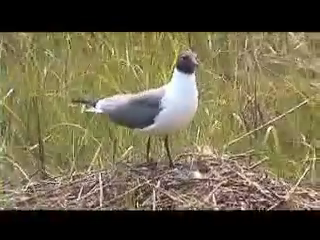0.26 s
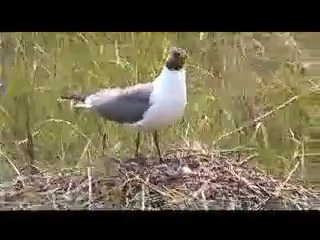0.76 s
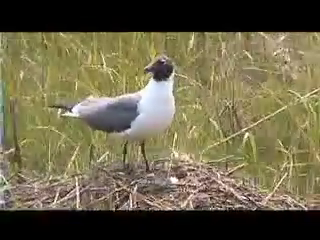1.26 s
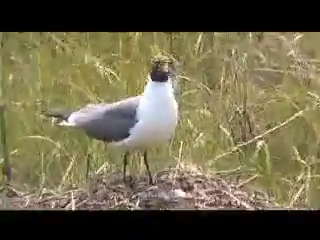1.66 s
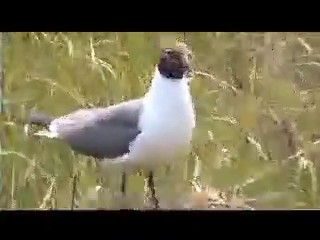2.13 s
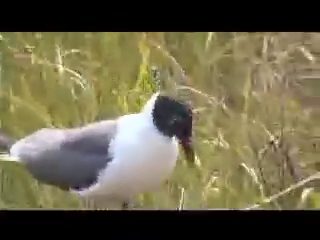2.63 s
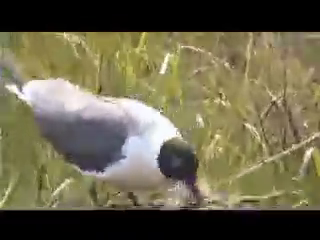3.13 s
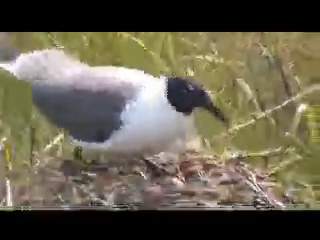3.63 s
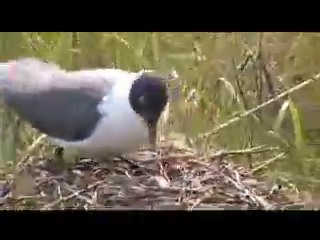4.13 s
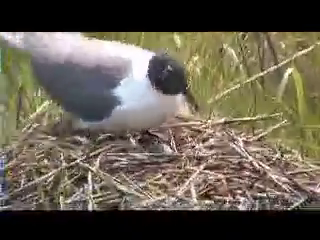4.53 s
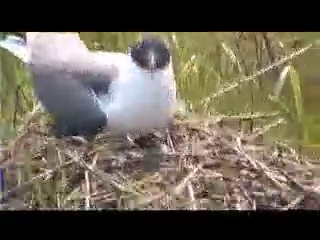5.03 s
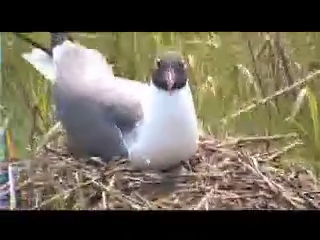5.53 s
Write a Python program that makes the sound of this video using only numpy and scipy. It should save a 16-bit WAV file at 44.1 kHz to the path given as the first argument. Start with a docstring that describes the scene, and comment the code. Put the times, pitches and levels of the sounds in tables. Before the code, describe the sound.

Wind rumbles and bumps against the microphone in a marsh gull colony. A nearby gull calls four times at an even pace, each a held, ringing note with a creaky start and a falling end, the first the loudest. Other gulls answer from farther off with short, raspy yelps, among faint whistles and a soft hiss. Dry stalks tick lightly in the second half, and the distant yelps carry on briefly before fading away.

```python
"""A gull colony on an open marsh. Wind rumbles on the microphone as one close gull starts four long calls,
a second apart: each creaks upward, holds, breaks to a lower note and falls. Further gulls yelp between
them, and a distant babble swells about a second in. Thin whistles come and go, and dry stalks begin to tick.
After the fourth call the far yelps overlap, then the whole sound fades out. Every gull's voice is a pulsing
syrinx heard through a windpipe and beak."""
import sys
import numpy as np
from scipy import signal
from scipy.fft import rfft, irfft, next_fast_len
from scipy.io import wavfile
from scipy.ndimage import uniform_filter1d

SR = 44100
rng = np.random.default_rng(int(sys.argv[2]) if len(sys.argv) > 2 else 0)


def bounce(signal):
    """Save signal as a 16-bit WAV file at the path given by the first command-line argument."""
    frames = np.transpose(np.atleast_2d(signal))
    limited = np.clip(frames, -1, 1)
    pcm = np.round(limited * 32767).astype(np.int16)
    wavfile.write(sys.argv[1], SR, pcm)


N = 255339
T = np.arange(N) / SR


# Creaky climb into the held note: time_from_lock_s, pitch_hz, relative_db, gape (0-1), effort (0-1)
CREAKY_CLIMB = [(-.048, 352, -13.5, 0, 0.6), (-.038, 466, -9.5, .3, .3), (-.029, 610, -5.5, .55, .7),
                (-.023, 682, 1.5, .8, 1), (-.015, 736, -.5, .95, 1), (-.005, 827.3, 2.5, .95, 0.7)]
# Creaky fall off the low note: time_from_release_s, pitch_hz, relative_db, gape (0-1), effort (0-1)
CREAKY_FALL = [(-.002, 737, 1, 0.2, 0), (.001, 709, -4.5, 0.24, .05), (.007, 594.4, -5.5, 0, 0.4),
               (.012, 563, -14.5, 0.17, 0), (.02, 498, -6.5, 0.6, .21), (.032, 462, -15, .05, .1),
               (.043, 424, -26, 0, 0)]
def long_call(lock_s, top_s, break_s, break_length_s, release_s, top_hz, break_hz, bend_hz,
              climb_db, lock_db, top_db, break_db, low_db, effort, narrowing, stretch):
    """The voice climbs, locks on an arch, breaks lower and falls. Rows: s, Hz, dB, gape, effort."""
    lock_hz, low_hz, low_gape = 953.2, 833, .61
    catch_s, catch_db, recover_s = 2.014, -4, .038  # the third call catches once
    u = np.linspace(0, 1, 24)
    s = np.r_[lock_s + (top_s - lock_s) * u, top_s + (break_s - top_s) * u]
    hz = np.r_[top_hz - (top_hz - lock_hz) * (1 - u) ** 2, top_hz - (top_hz - break_hz) * u ** 1.5]
    hz -= 10 * np.clip(1 - (break_s - s) / .013, 0, 1)  # a last slip before the break
    db = np.interp(s, [lock_s, top_s, break_s], [lock_db, top_db, break_db])
    db += catch_db * (s > catch_s) * (lock_s < catch_s) * np.exp(-np.abs(s - catch_s) / recover_s)
    gape = np.r_[np.ones_like(u), 1 - narrowing * np.sin(np.pi * u)]
    climb = np.array(CREAKY_CLIMB) * [stretch, 1, 1, 1, effort] + [lock_s, 0, climb_db, 0, 0]
    held = np.c_[s, hz, db, gape, np.full_like(s, effort)]
    low = [(break_s + break_length_s, low_hz, low_db, low_gape, 1),
           (release_s - .014, bend_hz, low_db, low_gape, .85)]
    fall = np.array(CREAKY_FALL) + [release_s, 0, low_db, 0, 0]
    return np.r_[climb, held, low, fall]


# The lead gull's phrases: lock_s, top_s, break_s, break_length_s, release_s, top_hz, break_hz, bend_hz,
# climb_db, lock_db, top_db, break_db, low_db, effort (0-1), beak_narrowing (0-1), climb_stretch (ratio)
LONG_CALLS = [(.072, .158, .343, .01, .389, 994, 908, 778, -22, -14.5, -16.7, -21, -23, 1, .4, 1.01),
              (1.031, 1.105, 1.29, .012, 1.348, 987, 904, 780, -28, -20, -19.3, -24.5, -25, .6, .3, .95),
              (1.967, 2.045, 2.23, .011, 2.291, 991, 906, 779, -27, -20, -21, -25, -26.5, .7, .3, .99),
              (3.033, 3.108, 3.268, .012, 3.357, 980, 905, 763, -26.5, -20.5, -22.5, -26, -28, .85, .15, 1.1)]
# Its windpipe and beak resonances: frequency_hz, gain_db
NEAR_FORMANTS = [(700, -29), (1000, -23), (1500, 3.5), (1950, -1.5), (2350, -12), (2950, -2.5),
                 (3500, -9.5), (4300, -18), (4900, 0), (5500, -13), (6400, -8.5), (8400, -27), (9600, -26),
                 (15000, -34)]
def near_gull():
    """One close syrinx: bright and steady on the held note, creaky at both ends."""
    return sum(gull_voice(long_call(*row), NEAR_FORMANTS, partials=36, glide_s=.0024, fade_s=.004,
                          soft_tilt_db=-6.5, gape_shift=.05, jitter=.0003, creak=.04, creak_hz=597,
                          waver_db=.27, waver_hz=22, rasp_db=-51, breath_db=-46) for row in LONG_CALLS)


def gull_voice(contour, throat, partials, glide_s, fade_s, soft_tilt_db, gape_shift,
               jitter, creak, creak_hz, waver_db, waver_hz, rasp_db, breath_db):
    """One call on the timeline: syrinx pulses and breath, coloured by the throat."""
    s, *columns = np.transpose(contour)
    start, end = int(s[0] * SR), int(s[-1] * SR)
    t = T[start:end]
    glide = int(glide_s * SR) + 1
    hz, db, *controls = (uniform_filter1d(np.interp(t, s, column), glide) for column in columns)
    gape, effort = controls[0], controls[-1]  # with no gape column, the beak follows the effort
    # membranes beat unevenly when slack at low pitch or retuning quickly
    slack = 1 / (1 + np.exp((hz - creak_hz) / 40))
    slide = np.tanh(np.abs(np.gradient(np.log(hz))) * SR / 8)
    hz = hz * (1 + (jitter + creak * slack) * wander(500, len(t)))
    harmonics = np.arange(1, partials + 1)[:, None]
    coarse = slice(None, None, 16)
    partial_hz = harmonics * hz[coarse]
    # a closing beak lowers the resonances; a soft push dulls the upper partials
    gain = throat_gain(partial_hz * (1 + gape_shift * (1 - gape[coarse])), throat)
    gain *= partial_hz < .4 * SR
    gain *= undb(soft_tilt_db * (1 - effort[coarse]) * np.log2(harmonics))
    # fainter calls come from further off, through more air that soaks up the treble
    air_db = .16 * min(db.max() + 29.5, 0)
    gain *= undb(air_db * (partial_hz / 13000) ** 2)
    gain /= np.sqrt(np.sum(np.abs(gain) ** 2, axis=0) / 2)
    phase = 2 * np.pi * np.cumsum(hz) / SR + 2 * np.pi * rng.random()
    sound = 0
    for k, partial_gain in enumerate(gain, 1):
        # higher partials drop out now and then as the head turns; turbulence spreads noise around each
        waver = undb(-waver_db * min(k * k / 8, 9) * (wander(waver_hz, len(t)) ** 2 - 1.09))
        turbulence = wander(700, len(t)) + 1j * wander(700, len(t))
        rasp = undb(rasp_db + 22 * slide) * k ** .68 * turbulence
        sound += np.real(np.interp(t, t[coarse], partial_gain) * (waver + rasp) * np.exp(1j * k * phase))
    # air hisses past the membranes, most while they retune or hang slack
    size = next_fast_len(len(t))
    bin_hz = np.fft.rfftfreq(size, 1 / SR)
    colour = np.abs(throat_gain(bin_hz, throat)) ** .48 * undb(air_db * (bin_hz / 1e4) ** 2)
    breath = unit_rms(irfft(rfft(rng.standard_normal(size)) * colour, size)[:len(t)])
    sound += breath * undb(breath_db + 26 * np.maximum(slide, slack))
    fade = np.clip(np.minimum(t - t[0], t[-1] - t) / fade_s, 0, 1)
    out = np.zeros(N)
    out[start:end] = sound * undb(db) * fade
    return out


def throat_gain(hz, throat):
    """Complex gain of windpipe and beak; a causal resonator's phase follows from its log gain."""
    grid = np.linspace(1, SR / 2, 2049)
    throat_hz, db = np.transpose(throat)
    log_gain = np.log(undb(np.interp(np.log(grid), np.log(throat_hz), db)))
    phase = -np.imag(signal.hilbert(np.r_[log_gain, log_gain[-2:0:-1]]))[:len(grid)]
    return np.exp(np.interp(hz, grid, log_gain) + 1j * np.interp(hz, grid, phase))


# Short arched yelps: start_s, crest_s, end_s, start_hz, crest_hz, end_hz, level_db, effort (0-1)
ARCHED_YELPS = [(0.413, 0.412, .46, 1270, 1235, 907, -52, 0.8), (.495, 0.553, .605, 980, 1107, 812, -54, 1),
                (.722, 0.75, .815, 615, 1095, 652, -30, 1), (0.757, .772, .8, 727, 760, 690, -48, 0.26),
                (1.884, 1.886, 1.925, 900, 920, 684, -53, 0.2), (2.645, 2.663, 2.69, 596, 657, 550, -57, 0),
                (4.447, 4.442, 4.48, 836, 880, 586, -55, 0.4),
                (5.109, 5.125, 5.15, 1100, 1165, 1050, -69, 0.8),
                (1.379, 1.409, 1.445, 532, 620, 570, -46, 0.2),
                (1.491, 1.516, 1.578, 937, 1220, 734, -37.5, 1),
                (2.469, 2.49, 2.512, 506, 552, 515, -56, .05),
                (2.643, 2.658, 2.695, 796, 950, 700, -58, 0.3),
                (2.771, 2.8, 2.852, 705, 1040, 790, -60, 0.5),
                (2.892, 2.923, 2.972, 631, 1120, 631, -39.5, 0.86),
                (3.055, 3.087, 3.12, 780, 1084, 624, -43, 0.9),
                (3.376, 3.39, 3.445, 1014, 993, 895, -62, 0.96),
                (4.102, 4.124, 4.165, 666, 1061, 804, -53.5, 0.67),
                (4.791, 4.808, 4.835, 806, 1143, 1030, -60.5, .95),
                (4.869, 4.882, 4.905, 1180, 1253, 1110, -49, 0.86),
                (5.002, 5.026, 5.075, 733, 1173, 677, -49.5, .75),
                (5.07, 5.075, 5.12, 960, 975, 714, -67, .75),
                (5.141, 5.172, 5.215, 643, 1126, 650, -48.5, 0.78)]
# Yelps that settle, then swell: start_s, crest_s, trough_s, swell_s, end_s,
# crest_hz, trough_hz, swell_hz, end_hz, crest_db, swell_db, effort (0-1)
SWELLING_YELPS = [(0.8, 0.808, .856, 0.88, .95, 1181, 815.5, 888.6, 694, -29, -34.5, 1),
                  (1.678, 1.693, 1.76, 1.817, 1.89, 1054, 805.6, 884, 685, -49.5, -49, 0.54),
                  (2.496, 2.522, 2.565, 2.63, 2.65, 1123, 966, 1004, 950, -57, -58, .95),
                  (4.111, 4.127, 4.22, 4.7, 4.245, 1145, 945, 930, 905, -59.5, -63.5, .9),
                  (4.26, 4.289, 4.3, 4.425, 4.455, 1204, 930, 1130, 807, -50, -56, 1),
                  (4.266, 4.286, 4.32, 4.415, 4.442, 1084, 852, 955, 880, -53, -56.5, 1),
                  (4.438, 4.478, 4.524, 4.592, 4.652, 1129, 906, 963, 617, -45, -47, 0.94),
                  (5.556, 5.574, 5.636, 5.726, 5.789, 1120, 915, 963, 819, -70.5, -73.5, 1)]
# Even glides, some dropping at the end: start_s, end_s, start_hz, end_hz, drop_hz, level_db, effort (0-1)
HELD_NOTES = [(0.831, 0.879, 621, 745, 3, -41.5, .4), (.88, .955, 832.4, 808.4, 91, -35, .2),
              (.94, 1.123, 821, 861.5, 199, -40, .1), (1.385, 1.474, 730, 800, 0, -55.5, .5),
              (1.42, 1.52, 880, 917, 60.5, -50.5, .75), (1.444, 1.5, 986, 948, -1, -50.5, .9),
              (1.57, 1.634, 638, 774, -2, -48, .6), (1.631, 1.727, 883, 824, 130, -46, .6),
              (4.164, 4.232, 687, 774, -1, -74, .55), (4.17, 4.235, 1010, 1096, 0, -69, .8),
              (4.92, 5.005, 640, 880, -1, -72, .3), (4.84, 4.882, 1082, 1175, -3.5, -51.5, .95),
              (4.892, 4.972, 1028, 1073, 0, -58.5, .9), (4.967, 5.01, 1192, 1170, 0.5, -55, .45)]
def far_calls():
    """Contours of the far calls; effort sinks with the pitch. Rows: s, Hz, dB, effort."""
    attack_db, release_db = -13.5, -11  # first and last level against the crest or swell
    u = np.linspace(0, 1, 16)
    leap = .4 * u + .6 * ease((u - .5) / .4)  # a rising voice ramps, then leaps
    rise = .45 * np.sin(np.pi / 2 * u) + .55 * leap
    arch = u ** 1.4

    def leg(start, end, curve):
        return np.array(start) + np.c_[u, curve, curve] * np.subtract(end, start)

    def contour(legs, top_hz, effort):
        rows = np.vstack(legs)
        sag_hz = top_hz - rows[:, 1]
        return np.c_[rows, np.clip(effort - sag_hz / 520, 0, 1)]

    calls = []
    for start_s, crest_s, end_s, start_hz, crest_hz, end_hz, db, effort in ARCHED_YELPS:
        start = start_s, start_hz, db + attack_db
        crest = crest_s, crest_hz, db
        end = end_s, end_hz, db + release_db
        calls.append(contour([leg(start, crest, rise), leg(crest, end, arch)], crest_hz, effort))
    for (start_s, crest_s, trough_s, swell_s, end_s,
         crest_hz, trough_hz, swell_hz, end_hz, crest_db, swell_db, effort) in SWELLING_YELPS:
        start = start_s, .7 * crest_hz, crest_db + attack_db
        crest = crest_s, crest_hz, crest_db
        trough = trough_s, trough_hz, swell_db - 1
        swell = swell_s, swell_hz, swell_db
        end = end_s, end_hz, swell_db + release_db
        legs = [leg(start, crest, rise), leg(crest, trough, ease(arch)),
                leg(trough, swell, ease(u)), leg(swell, end, u ** 4.9)]
        fresh_push = .29 * np.r_[np.zeros(2 * len(u)), ease(u), np.ones_like(u)]
        calls.append(contour(legs, crest_hz, effort + fresh_push))
    drop_s = .025
    for start_s, end_s, start_hz, end_hz, drop_hz, db, effort in HELD_NOTES:
        bend_hz = start_hz + (end_hz - start_hz) * (1 - drop_s / (end_s - start_s))
        bend = end_s - drop_s, bend_hz, db
        legs = [leg((start_s, start_hz, db), bend, u), leg(bend, (end_s, end_hz - drop_hz, db), arch)]
        calls.append(contour(legs, max(start_hz, end_hz), effort))
    return calls


# The far gulls' windpipe and beak resonances: frequency_hz, gain_db
FAR_FORMANTS = [(700, -21), (1100, -15.5), (1600, 2), (2250, 1.5), (2600, -4.5), (3300, -3), (3900, -8.5),
                (4500, -5), (5400, -5.5), (6500, -15.5), (9000, -30), (14000, -44)]
def far_gulls(calls, partials):
    """Gulls further off: each syrinx is raspier and less steady than the lead's."""
    return sum(gull_voice(contour, FAR_FORMANTS, partials, glide_s=.008, fade_s=.013,
                          soft_tilt_db=-8.5, gape_shift=.19, jitter=.0015, creak=.0251, creak_hz=625,
                          waver_db=.35, waver_hz=35, rasp_db=-38, breath_db=-39) for contour in calls)


# Tone of the wind on the microphone: frequency_hz, density_db
RUMBLE_SPECTRUM = [(12, -36), (20, -29.5), (38, -10), (149, -0.5), (264, -8), (476, -20.5), (576, -28),
                   (634, -31.5), (900, -40), (1170, -63), (1980, -120)]
# Gusts, then the closing fade-out: time_s, level_db
WIND_LEVELS = [(0, -45.5), (.08, -49.5), (.4, -45), (.55, -39), (.66, -48.5), (.85, -40.5), (.95, -48),
               (1.3, -44.5), (1.4, -34.5), (1.6, -45.5), (1.79, -35.5), (2.13, -51.5), (2.5, -46.5),
               (2.95, -52.5), (4.2, -54.5), (4.95, -48.5), (5.42, -52.5), (5.56, -58), (5.79, -62.5)]
def wind_rumble():
    """Wind rumbles on the microphone; stronger gusts rattle higher."""
    wind_db = np.interp(T, *np.transpose(WIND_LEVELS))
    rumble = banded_noise(RUMBLE_SPECTRUM, band_octaves=.51, swell_db=1.6 * wander(25),
                          flicker_db=1.3, flicker_hz=10, tilt_db=.15 * np.maximum(wind_db + 50.5, 0))
    return rumble * undb(wind_db)


# Sharp thumps of wind: start_s, peak_db, pitch_hz
WIND_BUFFETS = [(.211, -38, 90), (.215, -39.5, 400), (0.397, -31.5, 155), (0.434, -30.5, 170.7),
                (.544, -24, 239), (0.802, -27, 142), (.843, -30, 160), (1.191, -33, 186),
                (1.241, -29, 81.5), (1.35, -29, 120), (1.401, -23.5, 163), (1.488, -28, 142),
                (1.629, -37.5, 156), (2.461, -34.5, 127), (2.817, -36.5, 130), (2.844, -36, 148),
                (3.11, -40, 158), (3.923, -36.5, 95), (4.765, -39.5, 190), (4.824, -48, 175)]
def wind_buffets(t60_s=.024, attack_s=.0039):
    """Each buffet kicks the microphone's diaphragm into a short low swing."""
    out, t = np.zeros(N + SR), T[:SR // 5]
    envelope = np.exp(-np.log(1000) * t / t60_s) * (1 - np.exp(-t / attack_s))
    for start_s, db, hz in WIND_BUFFETS:
        swing = np.sin(2 * np.pi * hz * t) * envelope
        out[int(start_s * SR):][:len(t)] += undb(db) * swing / np.abs(swing).max()
    return out[:N]


# Tone of the marsh's hiss: frequency_hz, density_db
HISS_SPECTRUM = [(290, -27), (500, -8), (594, -3), (638, -7.5), (941, -9.5), (1180, -15.5), (2330, -16),
                 (2540, -18), (5830, -28), (15500, -36)]
# Fader moves for the background bed: time_s, hiss_db, babble_db
BED_LEVELS = [(0, -54, -66), (.6, -59, -70.5), (.85, -56, -45), (1.2, -56.5, -42), (1.469, -56.5, -49),
              (1.801, -58, -68), (2.601, -60.5, -74), (3.0, -58.5, -62.5), (3.95, -65, -76),
              (4.301, -66.5, -65), (4.9, -67.5, -67), (5.3, -74.5, -80), (5.79, -81.5, -84.5)]
def distant_bed():
    """The marsh beyond: a babble of gulls scattered by the reeds, over a flickering hiss."""
    s, hiss_db, babble_db = np.transpose(BED_LEVELS)
    babble = far_gulls(babble_calls(), partials=6) * undb(np.interp(T, s, babble_db))
    hiss = banded_noise(HISS_SPECTRUM, band_octaves=.19, swell_db=.55 * wander(7),
                        flicker_db=-1.6, flicker_hz=14, tilt_db=-.5)
    hiss *= undb(np.interp(T, s, hiss_db))
    return marsh_reverb(babble, t60_s=.29, wet_db=-3, top_hz=4000) + hiss


def babble_calls(count=60, spread_db=13.5, pitch_spread=.35):
    """Distant gulls repeat the same kinds of call at random moments, pitches and distances."""
    calls, kinds = [], far_calls()
    for moment, kind, pitch, distance in rng.random((count, 4)):
        s, hz, db, effort = kinds[int(kind * len(kinds))].T
        s = s - s[0] + moment * (T[-1] - .35)
        hz = hz * (1 + pitch_spread * (pitch - .5))
        db = db - db.max() - spread_db * distance
        calls.append(np.c_[s, hz, db, effort])
    return calls


# Dry stalks in the nest: start_s, peak_db
STALK_TICKS = [(2.803, -53), (3.5768, -64), (3.7548, -68), (3.786, -57), (4.0073, -58), (5.3777, -62.5)]
def stalk_ticks(decay_s=.0032):
    """Each stalk ticks with a few milliseconds of treble crackle."""
    out, t = np.zeros(N), T[:SR // 50]
    for start_s, db in STALK_TICKS:
        crackle = np.diff(rng.standard_normal(len(t) + 2), 2) * np.exp(-t / decay_s)
        out[int(start_s * SR):][:len(t)] += undb(db) * crackle / np.abs(crackle).max()
    return out


# Thin whistles from far off: start_s, end_s, start_hz, end_hz, level_db
THIN_WHISTLES = [(.605, .635, 2552, 2530, -65), (2.336, 2.544, 3040, 3090, -68.5),
                 (2.81, 2.894, 2790, 2630, -65.5), (3.435, 3.481, 2540, 2600, -81),
                 (3.645, 3.72, 2520, 2595, -72)]
def far_whistles():
    """Lone, slightly wavering tones."""
    out = np.zeros(N)
    for start_s, end_s, start_hz, end_hz, db in THIN_WHISTLES:
        hz = np.interp(T, [start_s, end_s], [start_hz, end_hz]) * (1 + .00127 * wander(33))
        tone = np.sqrt(2) * np.sin(2 * np.pi * np.cumsum(hz) / SR)
        gate = uniform_filter1d(1. * (T > start_s) * (T < end_s), int(.012 * SR))
        out += tone * undb(db) * gate
    return out


def marsh_reverb(dry, t60_s, wet_db, top_hz):
    """Reeds and wet ground scatter a short dull tail."""
    t = T[:int(.6 * SR)]
    tail = rng.standard_normal(len(t)) * np.exp(-np.log(1000) * t / t60_s) * (t > .006)
    tail = signal.lfilter(*signal.butter(1, top_hz, fs=SR), tail)
    return dry + undb(wet_db) * signal.fftconvolve(dry, tail / np.sqrt(np.sum(tail ** 2)))[:N]


def banded_noise(spectrum, band_octaves, swell_db, flicker_db, flicker_hz, tilt_db):
    """Noise in bands that swell together and flicker alone; tilt_db is per octave."""
    hz, db = np.transpose(spectrum)
    size = next_fast_len(N)
    octave = np.log2(np.maximum(np.fft.rfftfreq(size, 1 / SR), 1))
    noise = rfft(rng.standard_normal(size)) * undb(np.interp(octave, np.log2(hz), db, -120, -120))
    out = np.zeros(N)
    for centre in np.arange(np.log2(hz[0]), np.log2(hz[-1]) + band_octaves, band_octaves):
        band = irfft(noise * np.clip(1 - np.abs(octave - centre) / band_octaves, 0, 1), size)[:N]
        above_peak = min(centre - np.log2(hz[db.argmax()]), 1)
        out += band * undb(swell_db + flicker_db * wander(flicker_hz) + tilt_db * above_peak)
    return unit_rms(out)


def wander(rate_hz, size=N):
    """Random levels held 1 / rate_hz seconds and smoothed twice; spread near 1."""
    hold = max(int(SR / rate_hz), 1)
    steps = np.repeat(rng.standard_normal(size // hold + 1), hold)
    return 1.86 * uniform_filter1d(uniform_filter1d(steps, hold), hold)[:size]


def ease(x):
    return np.sin(np.pi / 2 * np.clip(x, 0, 1)) ** 2


def undb(db):
    return 10 ** (np.asarray(db) / 20)


def unit_rms(x):
    return x / np.sqrt(np.mean(x ** 2))


def scene():
    """The mono mix: lead gull in front, then the colony, the wind and the marsh."""
    near = near_gull()
    far = far_gulls(far_calls(), partials=14) + far_whistles()
    bed = distant_bed()
    wind = wind_rumble() + wind_buffets()
    near = marsh_reverb(near, t60_s=.8, wet_db=-39, top_hz=5000)
    far = marsh_reverb(far, t60_s=.11, wet_db=-19.5, top_hz=5060)
    return (near + far + wind + bed + stalk_ticks())[None]


def record(dry):
    """The microphone cuts the top."""
    top_hz = 15500
    return signal.sosfilt(signal.ellip(10, .2, 70, top_hz, fs=SR, output="sos"), dry)


dry = scene()
out = record(dry)
bounce(out)
```